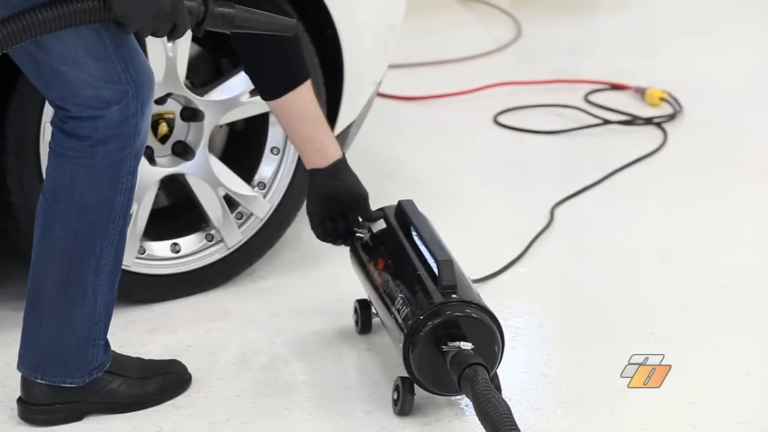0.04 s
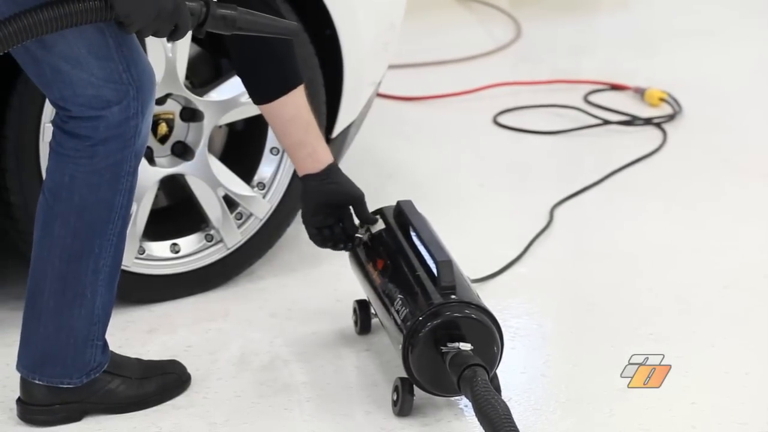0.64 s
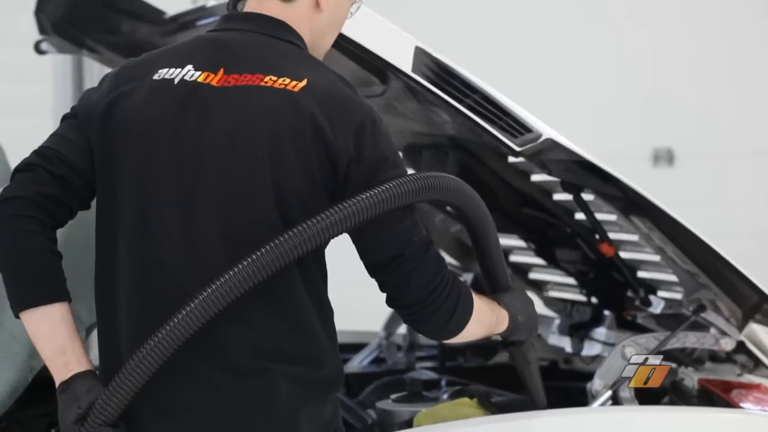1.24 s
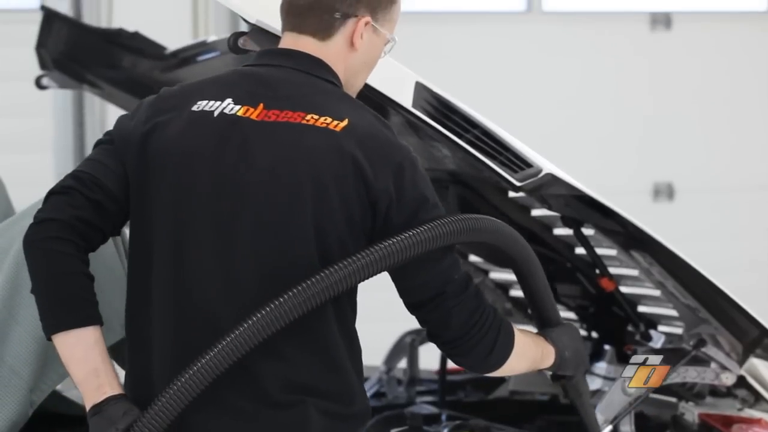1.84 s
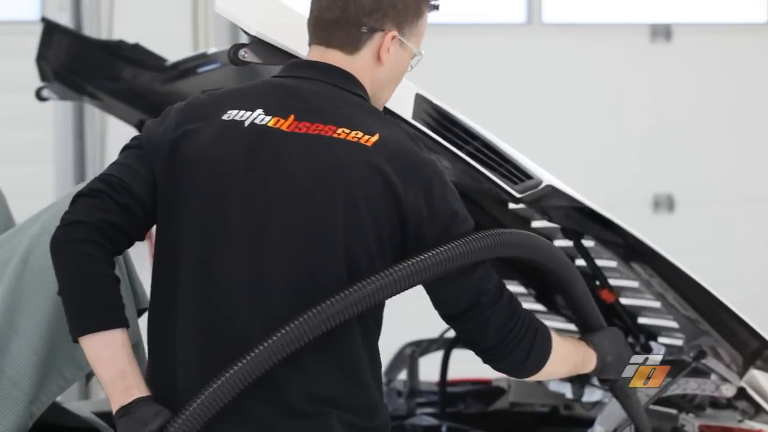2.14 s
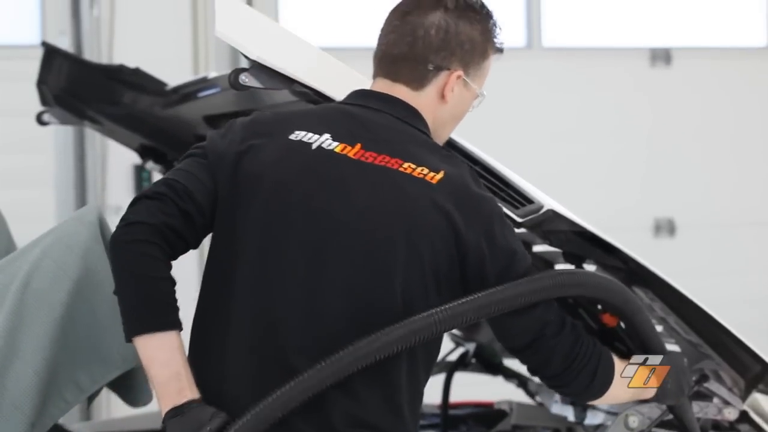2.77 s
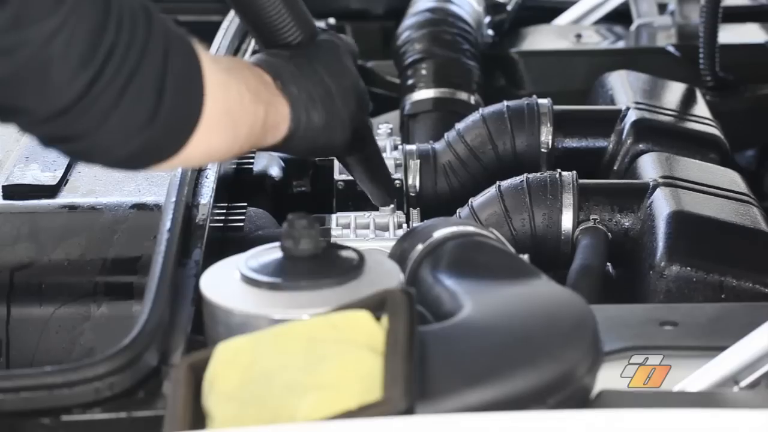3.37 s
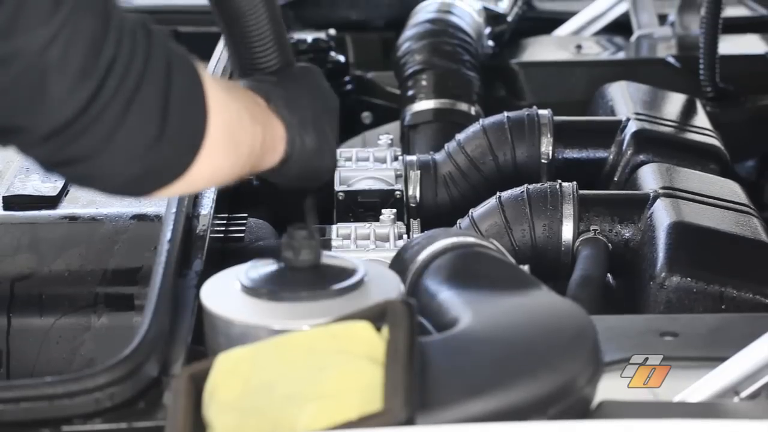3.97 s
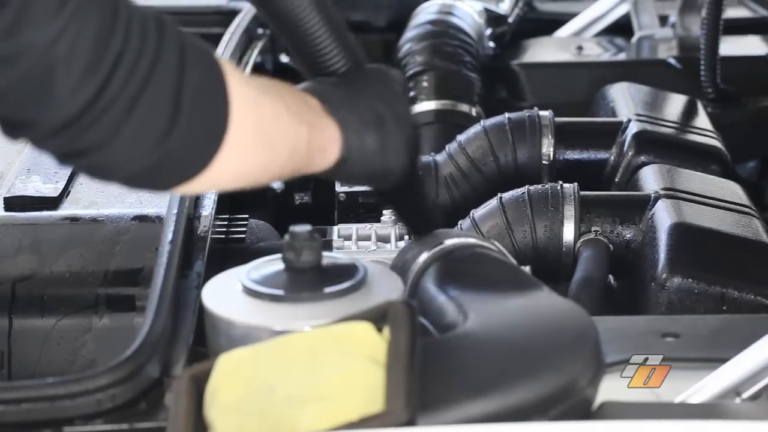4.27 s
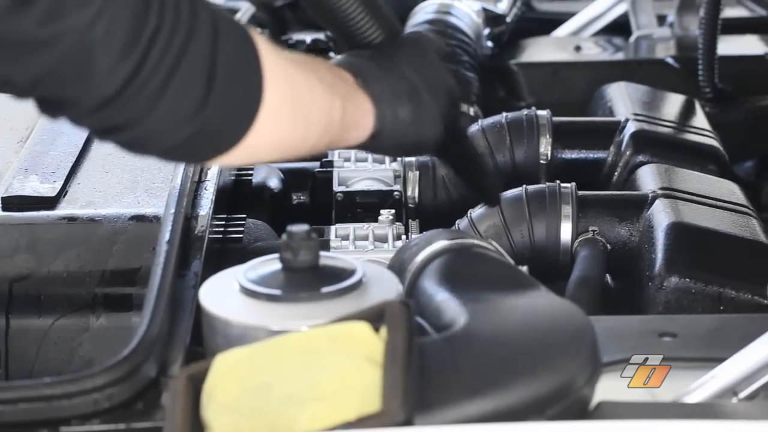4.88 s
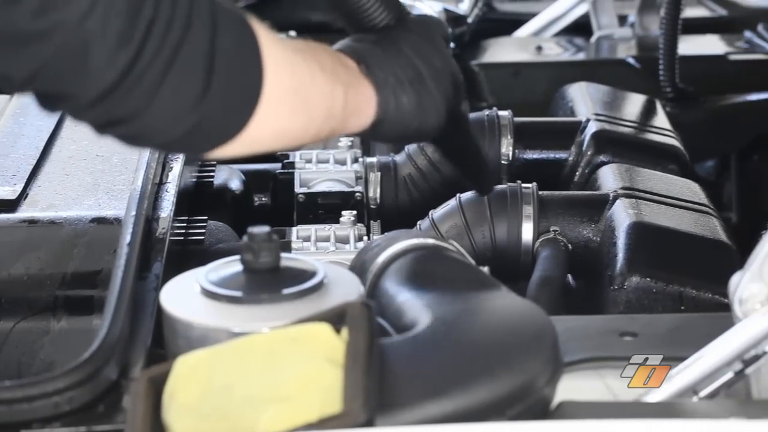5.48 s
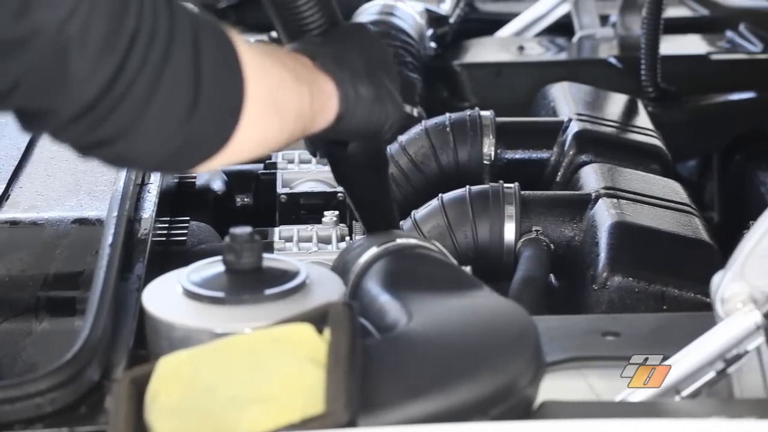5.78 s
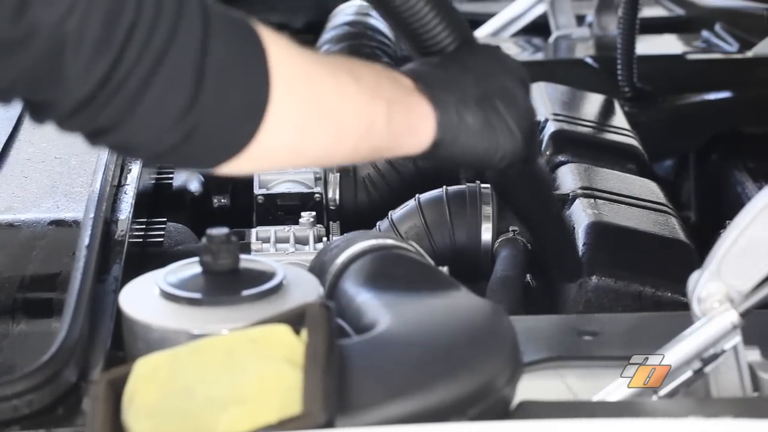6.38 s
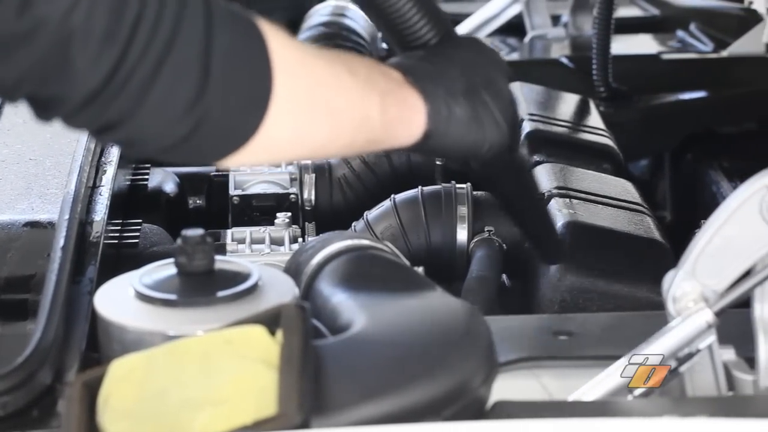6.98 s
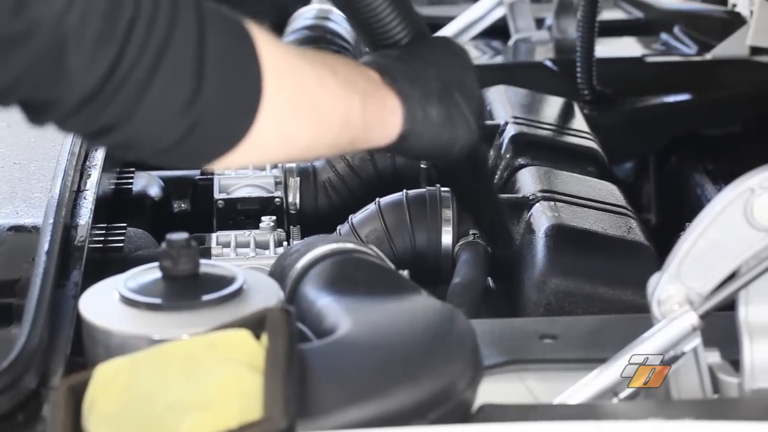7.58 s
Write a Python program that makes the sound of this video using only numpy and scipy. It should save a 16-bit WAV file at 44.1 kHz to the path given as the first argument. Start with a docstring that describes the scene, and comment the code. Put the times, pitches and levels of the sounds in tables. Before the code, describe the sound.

A car dryer in a garage starts with a few small switch clicks in the first 0.2 seconds. Its motor spins up, rising quickly in pitch, and a sharp click comes at 0.5 seconds. The motor settles into a steady whine that stays beneath everything. At about 0.6 seconds a loud jet of air bursts from the hose and is swept over a wet engine bay, swooshing and hissing. From 2 to 3.5 seconds it swells into a fuller roar, with hollows ringing like blown bottles. Wind faintly buffets the microphone from about 3.4 to 4.7 seconds. From 3.5 seconds the air comes in shorter, brighter surges with rumbles in the gaps and brief high whistles, strongest around 4.5 seconds. A thinner, high hiss follows until about 6 seconds. Then the rush grows fuller again, with scattered chirping whistles, still blowing at the end, near 7.7 seconds.

```python
"""In a garage, a car dryer clicks on: its motor spins up to a steady whine and air rushes from the hose.
The nozzle is swept over a wet engine bay. The jet of air swooshes where it strikes a part, roars and
rumbles in the gaps, hisses along surfaces, makes the hollows ring and whistles on edges.
For a moment the spent air buffets the microphone."""
import sys
import numpy as np
from scipy import signal
from scipy.fft import rfft, irfft, next_fast_len
from scipy.io import wavfile
from scipy.ndimage import map_coordinates

SR = 44100
rng = np.random.default_rng(int(sys.argv[2]) if len(sys.argv) > 2 else 0)


def master(y):
    """Save y as 16-bit WAV."""
    cut = np.clip(np.atleast_2d(y).T, -1, 1)
    pcm = np.round(cut * 32767)  # scale
    wavfile.write(sys.argv[1], SR, pcm.astype(np.int16))


N = 340452
TIME = np.arange(N) / SR


def amp(db):
    """Turn decibels into a gain."""
    return 10 ** (np.asarray(db) / 20)


def unit(x):
    """Scale to an average (rms) strength of 1."""
    return x / np.sqrt(np.mean(x ** 2) + 1e-20)


def look_up(x, rows):
    """Read a two-column table at x, joining its rows with straight lines."""
    return np.interp(x, *np.transpose(rows))


def wobble(rate):
    """A smooth random curve through `rate` points a second."""
    return map_coordinates(rng.standard_normal(N // 8), [TIME * rate], mode="wrap")


def filtered(x, colour):
    """Filter x by a colour: a function that gives the gain at each frequency."""
    size = next_fast_len(len(x) + SR // 8)
    hz = np.fft.rfftfreq(size, 1 / SR)
    return irfft(rfft(x, size) * colour(hz), size)[:len(x)]


def shape(spectrum):
    """The colour of a (frequency [Hz], level [dB]) table."""
    points_hz, db = np.transpose(spectrum)
    return lambda hz: amp(np.interp(np.log(hz + 1), np.log(points_hz), db))


def hill(centre_hz, low_octaves, high_octaves, slope):
    """A colour with one broad peak and a width for each side."""
    def colour(hz):
        width = np.where(hz < centre_hz, low_octaves, high_octaves)
        return (1 + (np.log2((hz + 1) / centre_hz) / width) ** 2) ** -slope
    return colour


def swell(start, end, fade_s):
    """The samples a passing sound covers, and its soft fade in and out."""
    span = np.flatnonzero((TIME > start) & (TIME < end))
    edge = np.minimum(TIME[span] - start, end - TIME[span]) / fade_s
    return span, np.sin(np.pi / 2 * np.clip(edge, 0, 1))


def steady(colour):
    """Lasting noise of strength 1."""
    return unit(filtered(rng.standard_normal(N), colour))


def gust(start, end, fade_s, db, colour):
    """A passing rush of noise."""
    out = np.zeros(N)
    span, envelope = swell(start, end, fade_s)
    out[span] = amp(db) * envelope * unit(filtered(rng.standard_normal(len(span)), colour))
    return out


def reflections(x, depth_db, scatter_hz=8500):
    """Echoes among the parts boost some pitches and cut others, shifting as the nozzle moves."""
    hz, _, spectra = signal.stft(x, SR, nperseg=2048)
    blur = np.outer(np.hanning(10), np.hanning(10))
    pattern = unit(signal.fftconvolve(rng.standard_normal(spectra.shape), blur, "same"))
    flattening = np.sqrt(1 + (hz[:, None] / scatter_hz) ** 4)  # high echoes scatter
    gain = amp(depth_db * pattern / flattening)
    gain /= np.sqrt(np.mean(gain ** 2, axis=1, keepdims=True))
    return signal.istft(spectra * gain, nperseg=2048)[1][:N]


# The garage's background noise: (frequency [Hz], relative level [dB])
GARAGE_COLOUR = [(15, -29.5), (25, -3), (283, -2), (839, -10), (954, -13), (3850, -25), (12000, -37.5),
                 (15600, -67.5), (22000, -120)]

def garage():
    """A faint, low rush fills the room."""
    return amp(-67.5) * steady(shape(GARAGE_COLOUR))


# The switch and small knocks on the dryer's case:
# (time [s], level [dB], pitch [Hz], width [octaves], time to fade by 60 dB [s])
CLICKS = [(0.099, -51, 743, 0.91, 0.019), (.143, -56, 3500, 1.9, 0.036), (.1555, -38.5, 3650, 2.4, 0.029),
          (0.5229, -24, 3870, 1.95, 0.0137)]

def clicks():
    """Each contact makes a dry snap of noise and one fast-fading ring."""
    out, t = np.zeros(N), np.arange(SR // 8) / SR
    attack = 1 - np.exp(-t / 0.00058)
    for start, db, hz, octaves, decay_s in CLICKS:
        snap = unit(filtered(rng.standard_normal(len(t)), hill(hz, octaves, octaves, slope=3.04)))
        ring = np.sin(2 * np.pi * hz * t) / octaves ** 2  # narrow knocks ring more
        out[round(start * SR):][:len(t)] += amp(db - 60 * t / decay_s) * attack * (snap + ring)
    return out


# How fast the motor turns: (time [s], speed [turns per second])
MOTOR_SPEED = [(.16, 39.07), (.25, 206.3), (.31, 270.7), (.374, 309.3), (.454, 342), (.53, 361.1),
               (.62, 365), (.87, 377), (.97, 353.5), (1.1, 382), (1.25, 388.7), (2.4, 392.9), (4.6, 387),
               (5.4, 388), (6.2, 389.7), (7.72, 391.5)]
# The whine of its shaft: (time [s], level [dB])
SHAFT_WHINE = [(.16, -89), (.35, -56), (.5, -48), (.7, -45), (.95, -43), (1.2, -40), (2.4, -41.5),
               (3, -46.5), (3.5, -44.5), (3.7, -58.5), (4.2, -52), (4.4, -56), (4.65, -47.5), (5.3, -59),
               (5.8, -56.5), (6.1, -46.5), (7.1, -49), (7.7, -46.5)]
# The case rings, favouring some fan tones: (frequency [Hz], level at full airflow [dB])
CASE_RESONANCES = [(900, -71.5), (1250, -45), (1600, -61), (2050, -54), (2300, -54), (2700, -76),
                   (3200, -60), (3500, -44), (4350, -48), (4700, -68), (5200, -56), (6400, -61),
                   (7000, -74)]
# Air rushing through the case: (frequency [Hz], relative level [dB])
CASE_COLOUR = [(20, -10), (70, -5), (130, -6.5), (400, -1), (800, -12), (1300, -4), (1550, -22),
               (1850, -10), (2700, -27), (3700, -2), (4500, -11), (6500, -13), (15000, -32)]
MOTOR_ON_S, HUM_HZ, START_HUM_DB = 0.16, 120, 7

def motor():
    """The shaft sings at its turning rate, the fan and sliding contacts at multiples; the coils hum."""
    speed = look_up(TIME, MOTOR_SPEED)
    flow = speed / speed.max() * (TIME > MOTOR_ON_S)
    angle = 2 * np.pi * np.cumsum(speed * (1 + 0.0025 * wobble(30))) / SR
    shaft = amp(look_up(TIME, SHAFT_WHINE) + 1.05 * wobble(19)) * np.sin(angle)
    fan = np.zeros(N)
    for multiple in (6, 12, 22):
        tone_db = look_up(multiple * speed, CASE_RESONANCES) + 2.1 * wobble(60)
        fan += amp(tone_db) * np.sin(multiple * angle)
    hum_db = -62 + START_HUM_DB * (1 - flow) + 2.4 * wobble(7)  # louder until up to speed
    hum = amp(hum_db) * np.sin(2 * np.pi * HUM_HZ * TIME) * np.clip(2 * flow, 0, 1)
    rush = amp(-48) * flow ** 2 * steady(shape(CASE_COLOUR))
    return np.sqrt(2) * (shaft + flow ** 2 * fan + hum) + rush


# The jet strikes a part: (start [s], end [s], fade [s], level [dB], pitch [Hz])
STRIKES = [(0.642, .768, 0.082, -20.5, 2060), (.967, 2.38, .25, -28.5, 2750),
           (2.149, 2.799, 0.16, -27, 2470), (2.597, 3.287, 0.17, -25.5, 1880),
           (3.55, 3.89, 0.037, -27.5, 4900), (4.069, 4.15, .025, -26, 5830),
           (4.137, 4.31, .015, -25.5, 5940), (4.297, 4.492, 0.037, -28.5, 3285),
           (4.466, 4.512, 0.016, -23, 5700), (4.534, 4.83, 0.017, -31.5, 3800),
           (4.99, 5.12, 0.037, -28, 5200), (5.274, 5.483, 0.058, -31.5, 4640),
           (5.5, 5.904, 0.045, -34.5, 3700), (6.34, 6.795, 0.087, -26.5, 5400),
           (6.52, 7.06, 0.094, -27, 3184), (6.97, 7.11, 0.058, -22.5, 4560),
           (7.077, 7.417, 0.066, -28, 3570), (7.647, 7.85, .049, -28.5, 3500)]

def swoosh(jet_db):
    """Small swirls of air swoosh all along, louder each time the jet strikes a part."""
    colour = lambda hz: hill(hz, low_octaves=1.57, high_octaves=1.22, slope=2.31)
    rush = amp(jet_db) * steady(colour(hz=2800))
    rush += sum(gust(start, end, fade, db, colour(hz)) for start, end, fade, db, hz in STRIKES)
    flutter_db = 0.34 * wobble(30) + wobble(220)
    return amp(flutter_db) * reflections(rush, depth_db=2.0)


# The jet dives into a gap:
# (start [s], end [s], fade [s], roar level [dB], roar pitch [Hz], rumble level [dB])
GAPS = [(0.575, 0.81, 0.065, -31.5, 1550.0, -48), (0.682, 1.132, 0.13, -35.5, 1420.0, -44.5),
        (1.001, 2.333, 0.16, -43.0, 487, -55.5), (2.089, 3.51, 0.59, -26.5, 1160, -65),
        (3.374, 3.698, 0.14, -39.5, 920, -47.5), (3.957, 4.061, 0.032, -40, 1380.0, -50),
        (4.124, 4.226, 0.026, -38, 1290.0, -47.5), (4.289, 4.508, 0.05, -32.0, 1282, -44.5),
        (4.549, 4.787, 0.061, -31.5, 990.0, -45), (4.871, 5.121, 0.055, -45, 900.0, -49),
        (5.44, 5.692, 0.16, -34.5, 710.0, -41), (5.884, 6.032, 0.08, -31, 816, -49.5),
        (6.005, 6.576, 0.084, -41, 760.0, -43.5), (6.515, 7.85, 0.085, -38, 881, -49.0)]

def roar(jet_db):
    """Bigger swirls churn in the gaps between the parts and sound lower."""
    colour = lambda hz: hill(hz, low_octaves=1.86, high_octaves=1.34, slope=2.0)
    rush = amp(jet_db - 8.5) * steady(colour(hz=950))
    rush += sum(gust(start, end, fade, db, colour(hz)) for start, end, fade, db, hz, _ in GAPS)
    flutter_db = 0.38 * wobble(30) + 0.59 * wobble(240)
    return amp(flutter_db) * reflections(rush, depth_db=2.5)


# The churned air behind the jet: (frequency [Hz], relative level [dB])
RUMBLE_COLOUR = [(20.0, -20), (70.0, -9), (170.0, 1), (280.0, 0), (600.0, -7), (2000.0, -36)]
# Wind on the microphone: (frequency [Hz], relative level [dB])
BUFFET_COLOUR = [(20, 4), (60, -1), (130, -20), (400, -45)]

def rumble(jet_db):
    """Churned air rumbles, most of all in the gaps, and for a while hits the microphone."""
    colour = shape(RUMBLE_COLOUR)
    wake = amp(jet_db - 21.5) * steady(colour)
    wake += sum(gust(start, end, fade, db, colour) for start, end, fade, _, _, db in GAPS)
    buffet = gust(start=3.37, end=4.75, fade_s=0.2, db=-59, colour=shape(BUFFET_COLOUR))
    return amp(1.55 * wobble(24)) * (wake + buffet)


# The nozzle's hiss: (frequency [Hz], relative level [dB])
HISS_COLOUR = [(100.0, -38), (1400.0, -23), (2500.0, -12.5), (4000.0, -2), (6000.0, 0.5), (7500.0, 1.5),
               (9500.0, 0), (12000.0, -4), (14000.0, -8), (16000.0, -12)]
# The jet skims a surface: (start [s], end [s], fade [s], level [dB], treble tilt [dB per octave])
SKIMS = [(0.645, 0.761, 0.086, -20.5, 2), (0.86, 2.3, 0.47, -25, 0), (2.077, 2.809, 0.22, -26.0, 1.5),
         (3.569, 3.921, 0.045, -25.5, 0), (3.87, 4.387, 0.111, -27, -1.0), (4.356, 4.611, 0.079, -26.5, -1),
         (4.7, 5.947, 0.062, -26.5, 4), (6, 6.341, 0.045, -35.5, 8), (6.444, 6.764, 0.068, -29, 0.0),
         (6.998, 7.351, 0.11, -26.5, -1.0), (7.604, 7.849, 0.067, -31, -4)]
BEAM_HZ = 7000  # above this the hiss points along the jet
FULL_JET_DB = -37  # below this the hiss fades faster than the jet

def hiss(jet_db):
    """Air hisses out of the nozzle and flares up on each surface; its treble depends on the aim."""
    colour = shape(HISS_COLOUR)
    weak_jet_db = 0.17 * np.minimum(jet_db - FULL_JET_DB, 0)
    rush = amp(jet_db - 1 + weak_jet_db) * steady(colour)
    for start, end, fade, db, tilt in SKIMS:
        aimed = lambda hz: colour(hz) * amp(tilt * np.log2(np.maximum(hz / BEAM_HZ, 1)))
        rush += gust(start, end, fade, db, aimed)
    flutter_db = 0.88 * wobble(11) + 0.77 * wobble(30) + 0.41 * wobble(400)
    return amp(flutter_db) * reflections(rush, depth_db=2.5)


# The jet's strength as the nozzle is carried about: (time [s], level [dB])
JET_LEVEL = [(.17, -68), (.26, -59), (.41, -48.5), (.6, -43), (.77, -34), (1.3, -35), (2.61, -30),
             (3.27, -33.5), (3.43, -30), (3.62, -36), (4.52, -37.5), (4.66, -32), (5.25, -37.5),
             (5.85, -37), (5.93, -30.5), (6.36, -33), (6.9, -30.5), (7.6, -31)]

def jet():
    """The four noises of the jet rise and fall with its strength."""
    jet_db = look_up(TIME, JET_LEVEL)
    return swoosh(jet_db) + roar(jet_db) + rumble(jet_db) + hiss(jet_db)


# Air blows across a hollow: (start [s], end [s], pitch [Hz], level [dB])
HOLLOWS = [(.173, 0.245, 1850, -61), (.27, .83, 375, -44.5), (0.703, 1.035, 346, -35),
           (0.906, 1.54, 1220, -32.5), (1.078, 2.7, 2920, -40.5), (1.46, 3.6, 458, -39.5),
           (1.426, 2.022, 1258, -39.5), (2.3, 3.25, 1750, -34), (2.94, 3.224, 2123, -26),
           (3.307, 3.854, 4640, -36), (4.222, 4.3, 4400, -29.5), (4.7, 5.95, 7590, -39.5),
           (4.6, 5.95, 2240, -47), (5.876, 7.399, 740, -40.5), (5.93, 6.3, 3930, -40),
           (5.963, 6.456, 6980, -38), (6.347, 6.45, 5920, -33.5), (6.551, 7.001, 2880, -36),
           (6.628, 6.76, 6185, -31), (6.733, 7.02, 2290, -34.5), (6.974, 7.03, 4040, -27),
           (7.197, 7.278, 5880, -30), (7.256, 7.348, 2930, -29)]

def hollows():
    """Like a bottle, each hollow picks a narrow band of pitches out of the rushing air."""
    out = np.zeros(N)
    for start, end, centre_hz, db in HOLLOWS:
        half_width_hz = 165 * np.sqrt(centre_hz / 1000)
        band = lambda hz: 1 / (1 + ((hz - centre_hz) / half_width_hz) ** 2)
        out += gust(start, end, 0.21 * (end - start), db, band)
    return out


# The clearest whistles on edges: (start [s], length [s], pitch [Hz], level [dB])
WHISTLES = [(0.679, .07, 6040, -30.5), (3.618, 0.062, 4905, -27), (3.842, .025, 7900, -27),
            (3.876, .02, 10200, -28), (3.981, .02, 9340, -28.5), (4.03, .022, 10000, -28),
            (4.05, .016, 9280, -25), (4.092, 0.0203, 4430, -26), (4.104, .044, 6460, -25.5),
            (4.185, .04, 6570, -34), (4.285, .022, 10730, -31), (4.48, .026, 4600, -25),
            (4.503, .033, 7200, -24), (4.524, 0.044, 7160, -20.5), (4.56, 0.086, 7100, -35.5),
            (5.021, .06, 6700, -30.5), (6.453, .03, 10170, -34), (6.484, .056, 12100, -37),
            (6.69, 0.098, 3990, -29)]
GLIDE_OCTAVES_PER_S = 0.7

def whistles():
    """An edge in the jet sheds swirls at a shaky pitch that slides up as the nozzle moves."""
    out = np.zeros(N)
    waver, flutter = wobble(900), amp(4.6 * wobble(200))
    for start, length, hz, db in WHISTLES + chirps():
        span, envelope = swell(start, start + length, fade_s=0.091 * length)
        spread_hz = np.interp(db, [-31, -22], [190, 65])  # strong tones are purer
        glide = 2 ** (GLIDE_OCTAVES_PER_S * (TIME[span] - start - length / 2))
        pitch = hz * glide + spread_hz * waver[span]
        out[span] += amp(db) * envelope * flutter[span] * np.sin(2 * np.pi * np.cumsum(pitch) / SR)
    return out


def chirps(start_s=6.38, end_s=7.7, per_second=22, low_hz=4700, high_hz=11440):
    """Faint chance whistles as the jet crosses clamps and ribs, as rows like those of WHISTLES."""
    slots = np.arange(start_s, end_s, 1 / per_second)
    late, long, high, loud = rng.random((len(slots), 4)).T
    starts = slots + late / per_second
    lengths = 0.023 * (0.5 + long)
    pitches = low_hz * (high_hz / low_hz) ** high
    levels_db = -36.5 + 6 * (loud - 0.5)
    return list(zip(starts, lengths, pitches, levels_db))


def scene():
    """The garage, the dryer and its air, the same in both channels."""
    mono = garage() + clicks() + motor()
    mono += (jet() + hollows() + whistles()) * (TIME > MOTOR_ON_S)
    return np.array([mono, mono])


def record(dry):
    """Cut off the very highest treble."""
    return np.array([filtered(channel, lambda hz: hz < 15740) for channel in dry])


dry = scene()
out = record(dry)
master(out)
```